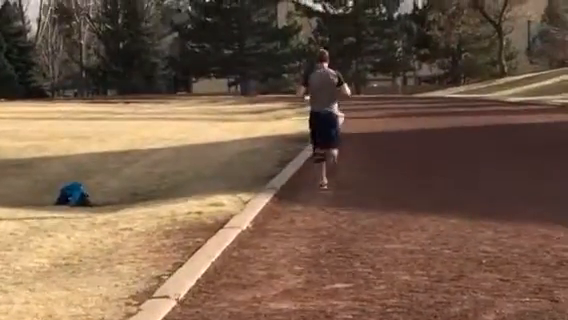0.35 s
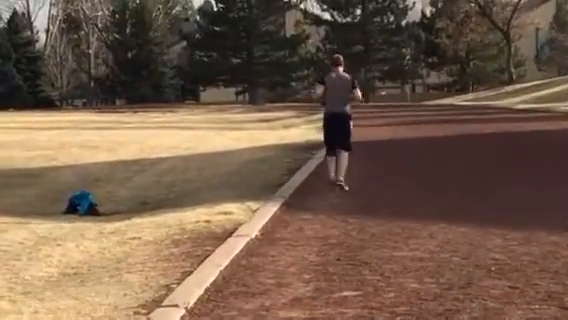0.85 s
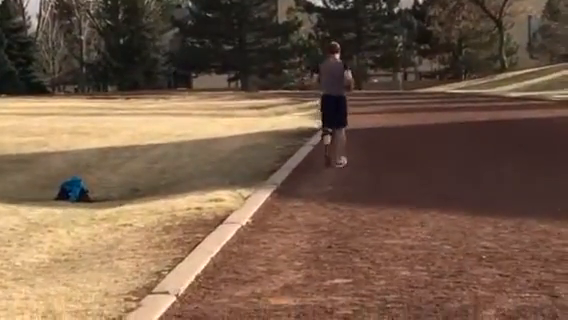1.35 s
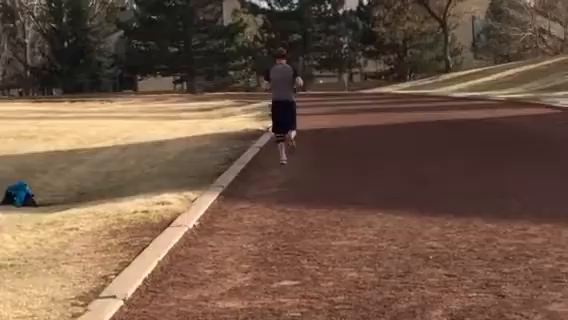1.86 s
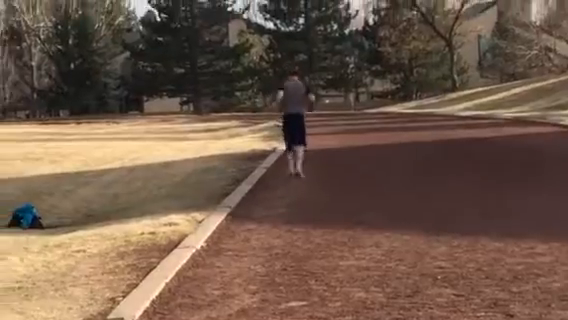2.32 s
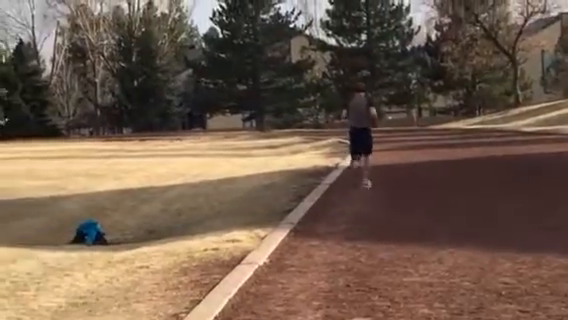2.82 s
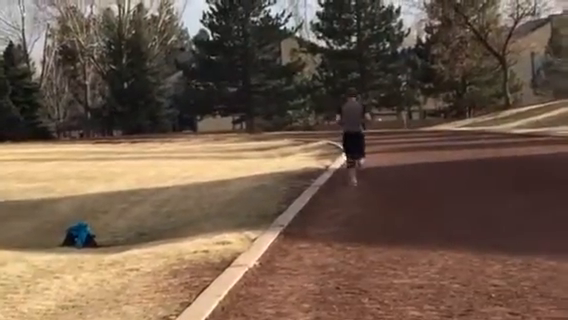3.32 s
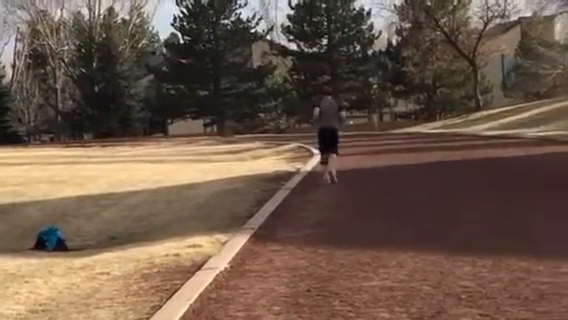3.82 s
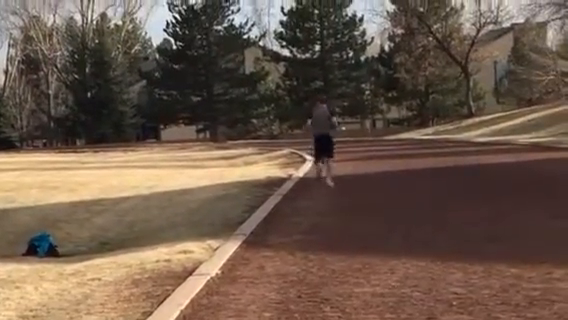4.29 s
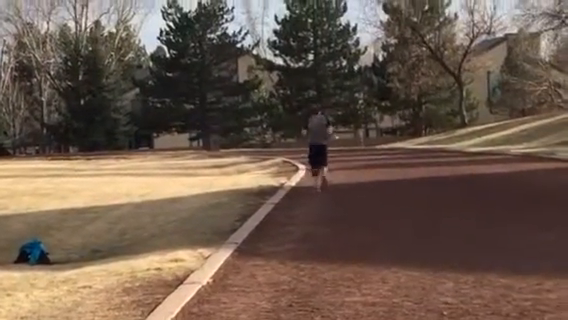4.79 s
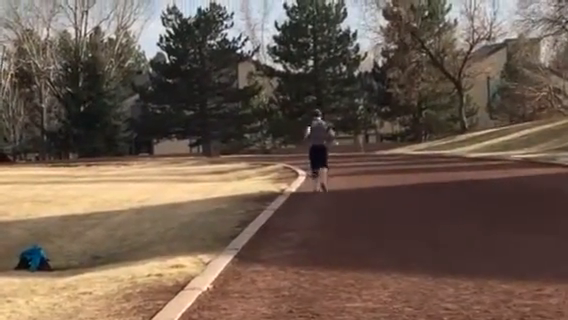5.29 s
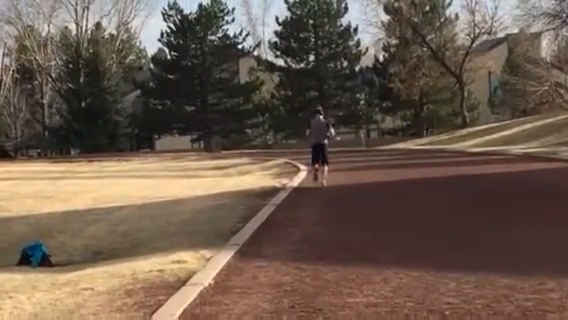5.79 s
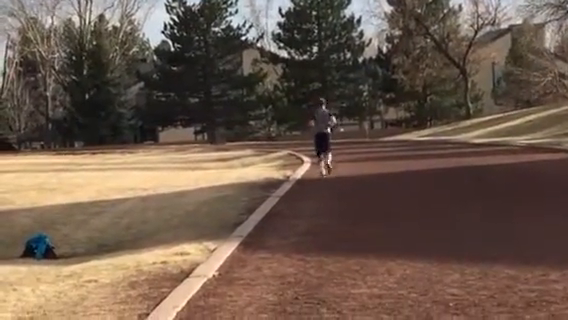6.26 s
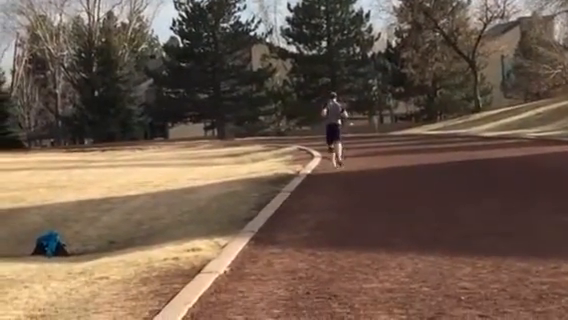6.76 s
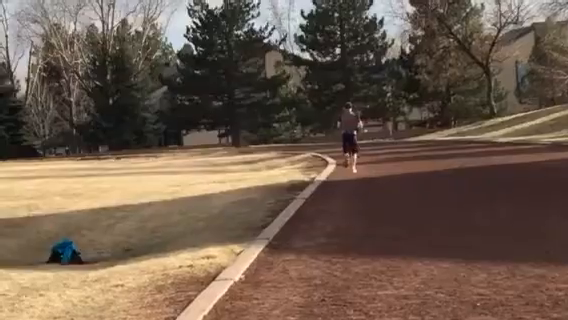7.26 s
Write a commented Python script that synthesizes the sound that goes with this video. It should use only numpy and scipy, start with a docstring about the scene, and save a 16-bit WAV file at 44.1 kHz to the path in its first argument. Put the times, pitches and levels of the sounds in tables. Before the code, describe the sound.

Soft gritty running footsteps fade away on a rubber track over low distant traffic rumble, with small dry ticks and faint late bird chirps.

```python
"""From the start, far traffic drones as shaped noise and an engine hums as a slowly sinking sine tone.
A runner moves off along a rubber track: crackling noise makes his shoe scuffs, which fade within four seconds.
Meanwhile a few dry ticks, short ringing modes with a crack of noise, sound near the microphone.
Late on, a bird in the trees gives a run of falling chirps, gliding tones with echoes; one last tick follows."""
import sys
import numpy as np
from scipy import signal
from scipy.fft import rfft, irfft, next_fast_len
from scipy.io import wavfile
from scipy.ndimage import uniform_filter1d, map_coordinates

SR = 44100
rng = np.random.default_rng(int(sys.argv[2]) if len(sys.argv) > 2 else 0)


def boost_factor(decibels):
    """Convert a level in decibels to a linear amplitude factor."""
    exponent = np.asarray(decibels, float) / 20
    return 10 ** exponent


def digitize_waveform(pressure):
    """Quantize a signal to 16-bit integers and store it at the path in sys.argv[1].

    Rows of a 2-D input are taken as channels; values are limited to [-1, 1].
    """
    field = np.atleast_2d(pressure).T
    bounded = np.clip(field, -1, 1)
    quanta = np.round(bounded * 32767).astype(np.int16)
    wavfile.write(sys.argv[1], SR, quanta)


N = 336483  # length in samples


def unit(x):
    """Scale to rms 1."""
    return x / np.sqrt(np.mean(x ** 2) + 1e-20)


def along(points, hz):
    """Read a curve of (f/Hz, value) points at the given frequencies, on a log axis."""
    f, v = np.transpose(points)
    return np.interp(np.log(hz + 1), np.log(f + 1), v)


def curves(rows):
    """One value per sample for each column after the time."""
    times, *columns = np.transpose(rows)
    return [np.interp(np.arange(N) / SR, times, column) for column in columns]


def wobble(rate):
    """A smooth random curve through `rate` random points a second (39 at most)."""
    knots = rng.standard_normal(int(N * 40 / SR) + 4)
    position = np.arange(N) * np.clip(rate, 0, 39) / SR
    return map_coordinates(knots, [position])


def coloured(x, spectrum):
    """Filter x by a spectrum of (f/Hz, level/dB) points."""
    size = next_fast_len(len(x) + 8192)
    gain = boost_factor(along(spectrum, np.fft.rfftfreq(size, 1 / SR)))
    return irfft(rfft(x, size) * gain, size)[:len(x)]


def rush(spectrum, patchy_db):
    """Coloured noise of rms 1, with patches of random gain over time and frequency."""
    z = signal.stft(rng.standard_normal(N), nperseg=512)[2]
    field = uniform_filter1d(rng.standard_normal(z.shape), size=6, axis=0)
    field = uniform_filter1d(field, size=14, axis=1)
    patchy = signal.istft(z * boost_factor(patchy_db * unit(field)), nperseg=512)[1][:N]
    return unit(coloured(patchy, spectrum))


def add(track, s, sound):
    """Mix a sound into the track at s seconds."""
    part = track[round(s * SR):][:len(sound)]
    part += sound[:len(part)]


# colour of the steady hiss, with narrow dips near 5, 7.7 and 10.5 kHz: (f/Hz, relative level/dB)
HISS_COLOUR = [(2200, -26), (3000, -1.5), (4500, -8), (4950, -7), (5400, -4.5), (7000, -6), (7700, -8.5),
               (8500, -6), (10000, -7.5), (10500, -14), (11000, -7.5), (15700, -11), (17000, -8.5)]


def steady_hiss():
    """Faint unchanging noise, mostly treble."""
    return boost_factor(-80) * rush(HISS_COLOUR, patchy_db=0.6)


# level of the deep throb over time, including chance fluctuation of the noise: (t/s, level/dB)
THROB_LEVEL = [(0, -58), (1.7, -52), (2.05, -54), (2.4, -58), (3.6, -56), (4.0, -49), (4.4, -59.5),
               (5.2, -53), (6.5, -57), (7.63, -54)]
# level of the rumble and of the whoosh near 950 Hz over time: (t/s, rumble level/dB, whoosh level/dB)
ROAD_LEVEL = [(0, -49, -67), (.3, -52.5, -67.5), (1.3, -51.5, -79), (2.5, -50.5, -66.5), (3.1, -51, -67.5),
              (4.2, -49.5, -69), (5.2, -51.5, -81.5), (6.2, -50, -75), (7.2, -52.5, -72.5),
              (7.63, -51, -70)]
# colours of the throb, the rumble and the tyre roar: (f/Hz, relative level/dB)
THROB_COLOUR = [(12, -50), (22, -31.5), (32, -11.5), (45, 2.5), (60, -6.5), (80, -25.5), (140, -120)]
RUMBLE_COLOUR = [(29, -31.5), (50, -8), (75, -0.5), (92, 0.5), (211, -11), (257, -19), (480, -38.5),
                 (620, -62), (1060, -120)]
TYRE_COLOUR = [(180, -28), (300, -3), (420, -5), (510, -7.5), (700, -3.5), (900, -2.5), (1130, -2),
               (1350, -5.5), (1740, -9), (2280, -17), (2930, -28.5), (4500, -34), (5850, -68), (9900, -120)]


def traffic():
    """Distant road as bands of noise: deep throb, exhaust rumble, a whoosh and the tyre roar near 1 kHz."""
    rumble_db, whoosh_db = curves(ROAD_LEVEL)
    throb_db, = curves(THROB_LEVEL)
    tyre_db = -58.5
    whoosh_colour = [(600, -38.5), (760, -5), (950, 5.5), (1150, -39)]  # (f/Hz, relative level/dB)
    air = wobble(6.5)  # moving air lifts and drops throb, rumble and roar together
    throb = boost_factor(throb_db + 0.88 * air) * rush(THROB_COLOUR, patchy_db=-0.1)
    rumble_gain = boost_factor(rumble_db + 0.6 * air + 0.49 * wobble(4.1))
    rumble = rumble_gain * rush(RUMBLE_COLOUR, patchy_db=0.5)
    whoosh = boost_factor(whoosh_db + 1.5 * wobble(3)) * rush(whoosh_colour, patchy_db=-0.4)
    tyres = boost_factor(tyre_db + 0.58 * air) * rush(TYRE_COLOUR, patchy_db=0.93)
    return throb + rumble + whoosh + tyres


# uneven level of the beating engine hum, partly chance, before its fast waver: (t/s, level/dB)
HUM_LEVEL = [(0, -53), (.55, -51), (.76, -56), (.95, -47.5), (1.1, -60), (1.9, -56), (2.35, -43.5),
             (2.47, -59), (2.91, -45), (3.5, -53.5), (4.27, -45), (4.44, -52), (4.97, -44.5), (5.62, -50),
             (5.88, -63), (6.06, -51.5), (7.1, -57.5), (7.35, -48.5), (7.63, -48)]
# other faint engine whines: (start t/s, end t/s, start f/Hz, end f/Hz, level/dB before the waver)
ENGINE_WHINES = [(0, 0.898, 131, 129.4, -58), (0, .7, 219, 214.3, -75), (3.4, 5.577, 205.2, 200.4, -65.5),
                 (4.604, 6.493, 223.2, 218.4, -64.5)]


def engines():
    """Firing tones that sink as vehicles draw away, wavering in the moving air."""
    firing_hz, sink_hz_per_s = 71.2, 1.5  # pitch at the start, and its steady fall
    waver_db, waver_hz = 2.5, 1.3
    hum_db, = curves(HUM_LEVEL)
    pitch_hz = firing_hz - sink_hz_per_s * np.arange(N) / SR + waver_hz * wobble(9)
    hum_gain = np.sqrt(2) * boost_factor(hum_db + waver_db * wobble(11))  # root 2: levels are rms
    out = hum_gain * np.sin(2 * np.pi * np.cumsum(pitch_hz) / SR)
    for start, end, from_hz, to_hz, db in ENGINE_WHINES:
        n = round((end - start) * SR)
        gain = boost_factor(db + 2.2 * wobble(5.08)[:n]) * signal.windows.tukey(n, 0.5)  # fades in and out
        glide_hz = np.linspace(from_hz, to_hz, n)
        add(out, start, np.sqrt(2) * gain * np.sin(2 * np.pi * np.cumsum(glide_hz) / SR))
    return out


# bird notes: (t/s, length/s, top f/Hz, end f/Hz, level/dB before shaping and echoes)
BIRD_CHIRPS = [(6.462, .024, 2830, 2780, -71.5), (6.579, .022, 2950, 2650, -75),
               (6.693, .026, 2900, 2600, -71), (6.809, .036, 3040, 2350, -72),
               (6.936, .036, 3270, 2300, -72.5), (7.079, .025, 3200, 2500, -71.5),
               (7.244, .038, 3400, 2250, -74)]


def bird():
    """Husky whistled notes hook up to their top pitch, then drop steeply and fade; a wall and trees answer."""
    hook_hz, hook_share = 2750, 0.22  # each note starts here and rises over this share of its length
    direct = np.zeros(N)
    for s, length, top_hz, end_hz, db in BIRD_CHIRPS:
        u = np.linspace(0, 1, round(length * SR))  # progress through the note
        pitch_hz = np.interp(u, [0, hook_share, 1], [hook_hz, top_hz, end_hz])
        husk = unit(uniform_filter1d(rng.standard_normal(len(u)), size=90))
        shape = np.abs(np.sin(np.pi * u ** 0.55)) ** 0.5 * (1 + 0.25 * husk)
        add(direct, s, np.sqrt(2) * boost_factor(db) * shape * np.sin(2 * np.pi * np.cumsum(pitch_hz) / SR))
    t = np.arange(SR // 5) / SR
    # the trees scatter a noisy tail from 12 ms on, falling 60 dB in 0.2 s
    trees = rng.standard_normal(len(t)) * boost_factor(-60 * t / 0.2) * (t > 0.012)
    tree_echo = signal.fftconvolve(direct, trees / np.linalg.norm(trees))[:N]
    wall_echo = np.pad(direct, (round(0.022 * SR), 0))[:N]
    return direct + boost_factor(-15) * wall_echo + boost_factor(-11) * tree_echo


# ringing modes of a tick: (multiple of the knock pitch, relative level/dB, share of the knock's t60)
TICK_MODES = [(1, 0, 1), (1.8, -7, .5), (2.7, -7, .5), (3.4, -12, .4)]
# dry ticks: (t/s, peak level/dB, knock f/Hz, knock t60/s, brightness/dB per octave)
# t60 is the time to die away by 60 dB
DRY_TICKS = [(.0804, -61, 2000, .003, 3), (.6409, -58, 2000, .003, 0), (1.836, -60, 2000, .003, 2),
             (2.015, -43.5, 1865, .017, -8), (2.0198, -58, 1865, .004, 2), (2.1205, -58, 2000, .004, 3),
             (2.8377, -59, 2000, .003, 1), (2.9287, -60, 2000, .003, 1), (3.1958, -42.5, 2100, .004, 0),
             (7.5766, -56, 2000, .003, 3)]


def ticks():
    """Dry snaps: a crack and a few modes that die within milliseconds, at new strengths each time."""
    crack_db, crack_t60_s = -12, 0.0025  # crack level against the knock
    out, t = np.zeros(N), np.arange(700) / SR
    crack_band = signal.butter(2, [1500, 6000], "bandpass", fs=SR, output="sos")  # Hz
    for s, peak_db, knock_hz, t60, tilt_db in DRY_TICKS:
        snap = np.zeros(len(t))
        for ratio, level, life in TICK_MODES:
            mode_db = level + tilt_db * np.log2(ratio) + 2.2 * rng.standard_normal()
            decay = boost_factor(mode_db - 60 * t / (t60 * life))
            snap += decay * np.sin(2 * np.pi * knock_hz * ratio * t)
        crack = unit(signal.sosfilt(crack_band, rng.standard_normal(len(t))))
        snap += boost_factor(crack_db - 60 * t / crack_t60_s) * crack
        snap *= 1 - np.exp(-t / 0.00035)  # soften the very first instant
        add(out, s, boost_factor(peak_db) * snap / np.abs(snap).max())
    return out


# footfalls: (landing t/s, landing level/dB, push-off level/dB)
FOOTFALLS = [(-.07, -70, -69), (.303, -64, -75), (.662, -69.5, -76), (1.045, -75, -79), (1.395, -73, -78),
             (1.77, -75, -77), (2.12, -74, -79), (2.5, -71, -80), (2.86, -73, -80), (3.22, -83, -81),
             (3.6, -84, -85), (3.98, -76, -84)]
# colour of the scuffing: (f/Hz, relative level/dB)
SCUFF_COLOUR = [(500, -30), (1200, -9), (2000, 4.5), (2700, -3), (3700, -5), (4600, -14), (7000, -23),
                (12000, -29)]


def runner():
    """Each sole rolls onto the granular rubber, then scrapes as the toe pushes off."""
    roll_s, blur_per_s = 0.028, 0.004  # roll-on time, and its lengthening as he draws away
    stance_s, scrape_s = 0.15, 0.045  # wait until push-off, and half-width of the scrape
    t, stroke = np.arange(N) / SR, np.zeros(N)
    for s, land_db, push_db in FOOTFALLS:
        stroke += boost_factor(land_db) * np.exp(-(np.abs(t - s) / (roll_s + blur_per_s * s)) ** 1.4)
        stroke += boost_factor(push_db) * np.exp(-((t - s - stance_s) / scrape_s) ** 2)
    # rubber granules slip one by one, in clumps: a crackle of uneven size
    size = boost_factor(10 * rng.exponential(size=N))
    slips = rng.random(N) < 0.022  # chance of a slip at each sample
    grains = np.clip(rng.standard_normal(N) * size * slips, -11, 11)
    grains = grains * boost_factor(1.5 * wobble(38))
    rubbing = 0.35 * rng.standard_normal(N)  # smooth noise between the grains
    return stroke * unit(coloured(grains + rubbing, SCUFF_COLOUR))


def scene():
    """All sources reach one microphone."""
    return (traffic() + engines() + bird() + ticks() + runner())[None]


def roll_off(x):
    """The treble ends steeply here."""
    return signal.sosfilt(signal.butter(12, 15640, fs=SR, output="sos"), x)


def record(dry):
    """A steady hiss joins the scene."""
    mix = dry + steady_hiss()
    return roll_off(mix)


dry = scene()
out = record(dry)
digitize_waveform(out)
```